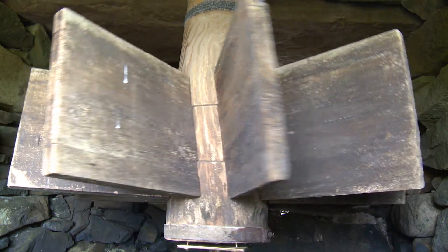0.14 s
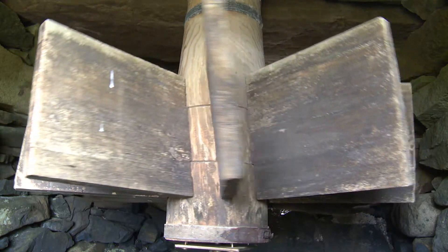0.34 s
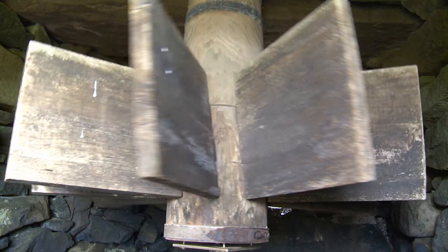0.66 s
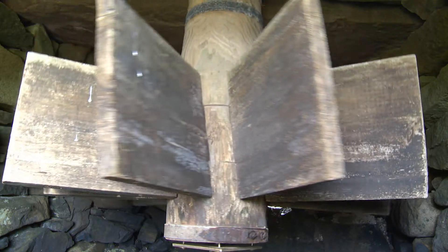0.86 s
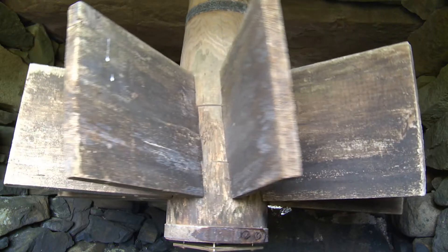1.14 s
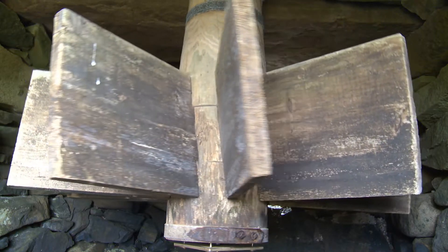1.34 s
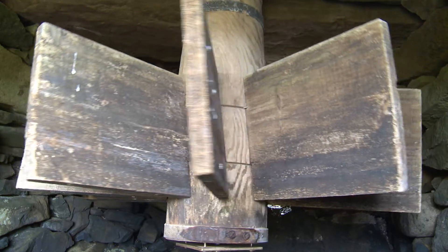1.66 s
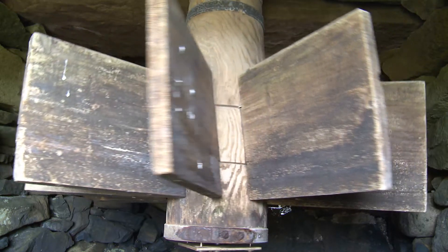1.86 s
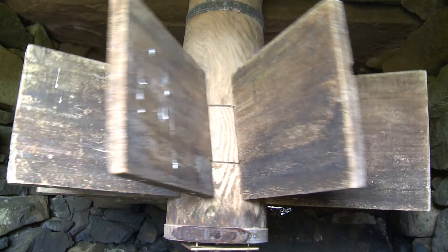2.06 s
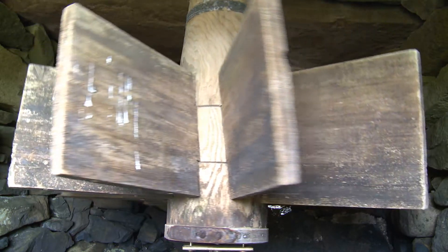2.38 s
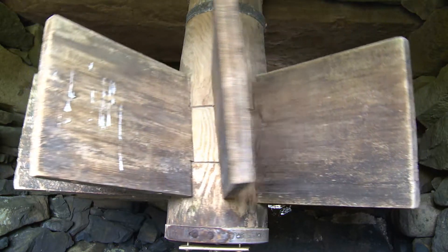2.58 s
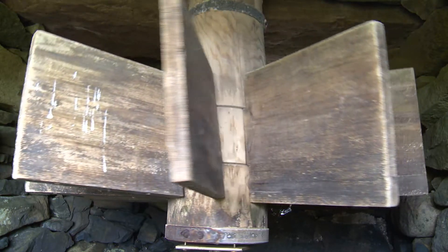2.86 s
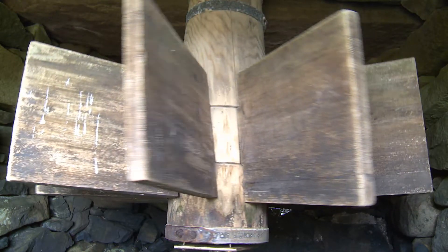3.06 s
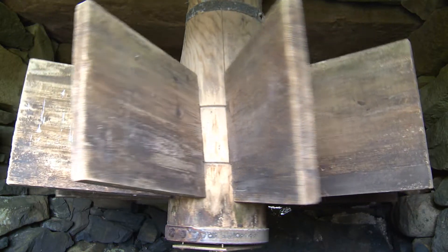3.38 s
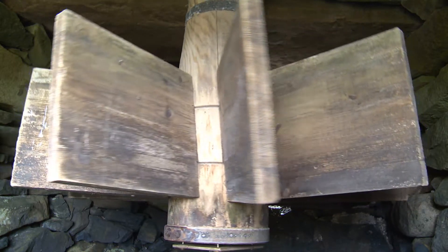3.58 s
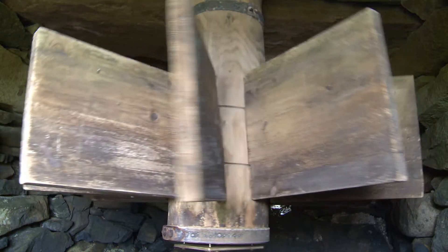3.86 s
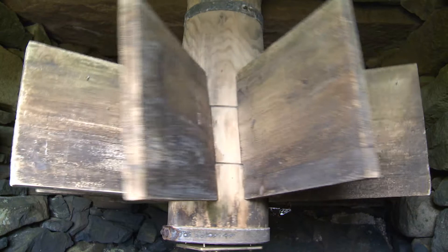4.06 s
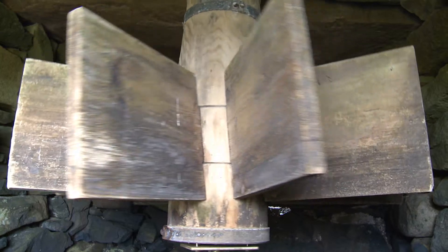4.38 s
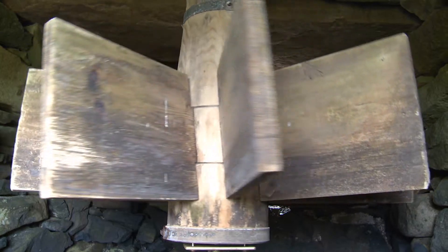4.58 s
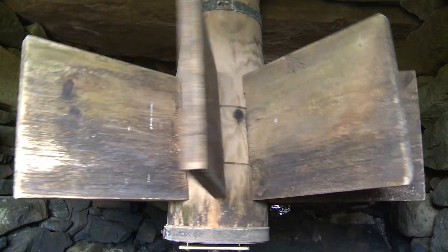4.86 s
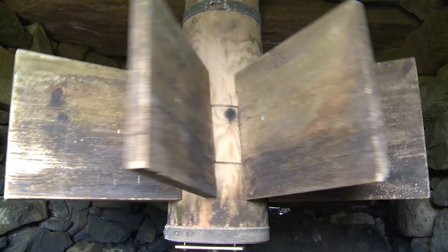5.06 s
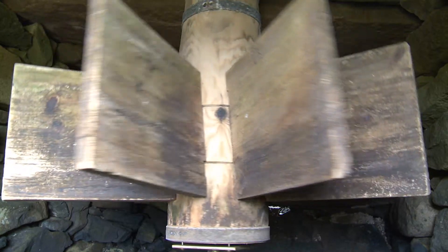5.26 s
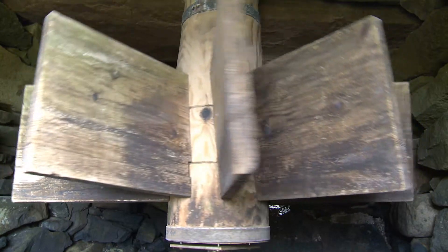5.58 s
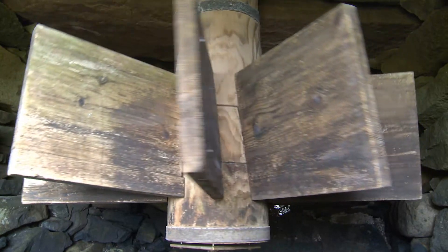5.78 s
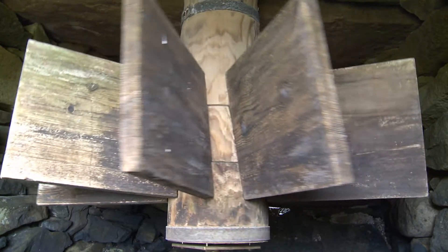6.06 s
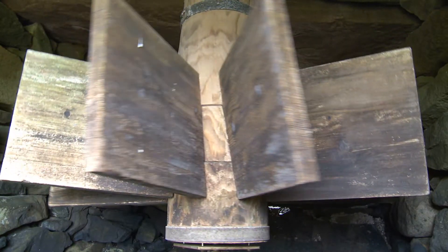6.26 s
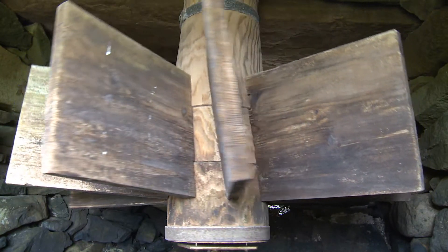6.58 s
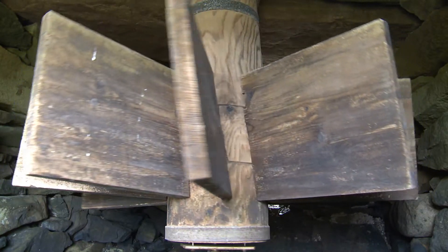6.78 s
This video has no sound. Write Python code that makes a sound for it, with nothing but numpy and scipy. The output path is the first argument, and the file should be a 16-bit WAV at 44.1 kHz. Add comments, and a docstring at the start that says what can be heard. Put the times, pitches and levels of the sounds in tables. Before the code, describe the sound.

Steady, dense gurgling water with only slight surges, heard close in a small stony hollow with a very short, dull echo. Single bubbles pop out at mid pitch, low gulps sound now and then, and faint droplets tick over soft spray. A broad low hum stays underneath. Deep wind thumps and flutter strike the microphone irregularly, heaviest in the middle and later part, easing at the end.

```python
"""In the stone pit under a mill, a stream rushes beside the wooden paddles of a wheel, itself not heard.
Bubbles of all sizes ring in the rush, as short-lived resonances struck at random over a noise blur;
fine spray and ticking droplets lie above it, and single bubbles stand out with a short stone echo.
The hollow under the stones hums as resonant noise and gulps in choked low notes.
Gusts of wind rumble on the microphone as three bands of low noise."""
import sys
import numpy as np
from scipy import signal
from scipy.io import wavfile
from scipy.ndimage import uniform_filter1d

SR = 44100
rng = np.random.default_rng(int(sys.argv[2]) if len(sys.argv) > 2 else 0)


def persist_wave(psi):
    """Save psi, clipped to +-1, as 16-bit WAV."""
    counts = np.round(np.clip(psi, -1, 1) * 32767).astype(np.int16)
    wavfile.write(sys.argv[1], SR, np.atleast_2d(counts).T)


def gain_from_db(level_db):
    """Convert decibel levels to linear amplitude factors (20 dB per decade)."""
    decades = np.asarray(level_db, float) / 20
    return 10 ** decades


N = 305524


def rms_one(x):
    """Scale to rms 1."""
    return x / np.sqrt(np.mean(x ** 2) + 1e-20)


def in_time(rows):
    """A two-column curve (time_s, value) at every sample."""
    return np.interp(np.arange(N) / SR, *np.transpose(rows))


def drift(rate_hz):
    """Slow random wander of spread 1: noise through a double one-pole low-pass."""
    step = 40   # samples between the slow values
    r = np.exp(-2 * np.pi * step * rate_hz / SR)
    noise = rng.standard_normal(N // step + 2002)
    slow = signal.lfilter([1], [1, -2 * r, r * r], noise)[2000:]   # past the filter's start
    return np.interp(np.arange(N) / step, np.arange(len(slow)), rms_one(slow - slow.mean()))


def resonate(x, hz, width_hz):
    """A two-pole resonance of gain 1 on top."""
    r = np.exp(-np.pi * width_hz / SR)
    poles = [1, -2 * r * np.cos(2 * np.pi * hz / SR), r * r]
    return signal.lfilter([(1 - r * r) / 2, 0, (r * r - 1) / 2], poles, x + 1e-18)


def even(x, span_s):
    """Divide out the slow level of a noise."""
    return x / np.sqrt(uniform_filter1d(x ** 2, int(span_s * SR)) + 1e-12)


def scatter(loudness, count):
    """Random rows (time_s, peak_db, pitch_hz), spread evenly over time and log pitch."""
    spread_db = 4   # either way
    hz_list, db_list = np.transpose(loudness)
    when, place, luck = rng.random((count, 3)).T
    hz = hz_list[0] * (hz_list[-1] / hz_list[0]) ** place
    peak_db = np.interp(np.log(hz), np.log(hz_list), db_list) + spread_db * (2 * luck - 1)
    return list(zip(when * (N - 1) / SR, peak_db, hz))


def add_plink(out, s, peak_db, hz, cycles, glide, swell_share):
    """A note swells and dies within a few cycles; glide bends its pitch, in % per cycle at first."""
    swell = swell_share * cycles   # cycles from onset to peak
    turns = np.arange(int(8 * swell / hz * SR)) * hz / SR
    bent = turns + glide / 100 * np.minimum(turns, 2 * cycles) * turns / 2
    wave = turns / swell * np.exp(1 - turns / swell) * np.sin(2 * np.pi * bent)
    at = max(round((s - 0.26 * swell / hz) * SR), 0)
    out[at:at + len(wave)] += gain_from_db(peak_db) * wave[:N - at]


def pit(x):
    """Eight feedback delays between the stone walls, duller on every round."""
    t60_s, stone_cut_hz = 0.16, 2200   # decay of the lowest pitches; low-pass on each round
    out, dull = np.zeros(N), np.exp(-2 * np.pi * stone_cut_hz / SR)
    for k, lag in enumerate((rng.uniform(0.006, 0.022, 8) * SR).astype(int)):
        loop, gain, state = x.copy(), gain_from_db(-60 * lag / SR / t60_s), [0.]
        for i in range(lag, N, lag):
            back, state = signal.lfilter([gain * (1 - dull)], [1, -dull], loop[i - lag:i], zi=state)
            loop[i:i + lag] += back[:N - i]
        out += (loop - x) * (-1) ** k   # echoes alone, in alternate polarity
    return out


def wind():
    """Eddies press on the diaphragm: big ones heave slowly, small ones flutter and buffet."""
    # heave, flutter and buffeting: low_hz, high_hz
    bands = [(5, 15.7), (18, 39.7), (45, 108)]
    # the same three bands: gain_db in wind
    band_gains = [0.4, 0.9, -3.5]
    # the same three bands: level_db of the steady low rumble that stays between gusts
    calm_levels = [-50, -59, -37.5]
    # breeze on the microphone, before the band gain: time_s, level_db
    breeze_curve = [(0.0, -33), (0.62, -47), (1.0, -33), (1.4, -42), (1.85, -26), (2.3, -38), (2.9, -32),
                    (3.9, -22.5), (4.2, -31.5), (5.4, -21), (6.3, -29), (6.55, -39), (6.93, -52)]
    # gusts, before the band gain: top_s, peak_db, half_length_s, eddy pitch in octaves above the heave
    gust_rows = [(0.0, -23, 0.05, 1.5), (0.12, -32, 0.08, 2.5), (0.813, -22, 0.034, 0.4),
                 (0.95, -26, 0.03, 1.4), (1.67, -12.5, 0.059, 0.4), (1.98, -18.5, 0.03, 3.5),
                 (2.027, -17.5, 0.054, 0), (2.57, -23, 0.07, 0.4), (2.707, -16, 0.04, 1.3),
                 (2.93, -24, 0.03, 2.5), (3.125, -8, 0.049, 0.3), (3.21, -12, 0.032, 1.4),
                 (3.296, -17, 0.02, 3.0), (3.384, -13, 0.04, 0), (3.58, -10.5, 0.04, 0.5),
                 (3.67, -6.5, 0.065, 0.7), (3.806, -14, 0.026, -2), (3.84, -8, 0.026, 1.1),
                 (4.034, -11.5, 0.053, 0.8), (4.125, -18, 0.033, 0.3), (4.306, -3, 0.026, 0.5),
                 (4.383, -12, 0.06, 0), (4.623, -16, 0.061, -0.5), (4.74, -7.5, 0.063, 0),
                 (4.84, -14, 0.028, 1.1), (4.893, -12, 0.04, 0.3), (4.996, -7.5, 0.035, 2.1),
                 (5.182, -7.5, 0.031, 0.5), (5.404, -17, 0.036, 2.4), (5.52, -9.5, 0.036, 1.4),
                 (5.66, -18, 0.036, 2.5), (5.74, -25, 0.04, 0.2), (6.1, -14, 0.058, 1.3),
                 (6.25, -17.5, 0.04, 0.1), (6.336, -15, 0.04, 1.2)]
    slope_db_per_octave = 7.5   # a gust weakens away from its eddy pitch
    t = np.arange(0, N, 64) / SR
    breeze_power = gain_from_db(2 * np.interp(t, *np.transpose(breeze_curve)))
    top_s, peak_db, half_s, pitch = np.transpose(gust_rows)
    swells = np.exp(-((t[:, None] - top_s) / half_s) ** 2)
    out, white = np.zeros(N), rng.standard_normal((3, N + SR))
    for k, (band_hz, noise, span_s) in enumerate(zip(bands, white, (0.16, 0.1, 0.08))):
        off_pitch = np.abs(pitch - 1.5 * k)   # bands lie about 1.5 octaves apart
        gust_power = swells @ gain_from_db(2 * (peak_db - slope_db_per_octave * off_pitch))
        wind_power = (gust_power + breeze_power) * gain_from_db(2 * band_gains[k])
        level = np.sqrt(wind_power + gain_from_db(2 * calm_levels[k]))
        band = signal.butter(2, band_hz, "band", fs=SR, output="sos")
        eddies = signal.sosfilt(band, noise)[SR:]   # past the filter's start
        out += np.interp(np.arange(N) / SR, t, level) * even(eddies, span_s)
    return out


def hollow():
    """The churning water keeps the air under the stones humming on one broad note."""
    # how hard the churn drives the hollow: time_s, hum level_db
    hum_curve = [(0.0, -21.5), (0.46, -24.5), (0.9, -23.5), (1.3, -27.5), (1.56, -24), (2.06, -22),
                 (2.3, -26), (2.85, -24), (3.0, -20.5), (3.5, -26), (3.71, -20), (4.67, -22.5), (4.94, -19),
                 (5.13, -24), (5.92, -22), (6.27, -23.5), (6.52, -27.5), (6.93, -24)]
    hz, width_hz = 196, 45.6
    hum = resonate(rng.standard_normal(N), hz, width_hz)
    hum = resonate(hum, hz, 1.48 * width_hz)
    return gain_from_db(in_time(hum_curve)) * rms_one(hum)


def gulps():
    """A pocket of air pulses at the pitch of the hollow: quick to start, choked after a few cycles."""
    # air trapped in the hollow: time_s (3 ms after the onset), level_db, pitch_hz
    gulp_rows = [(0.173, -7.5, 195), (1.368, -3, 188), (1.579, -4.5, 196), (3.507, -14, 203),
                 (3.869, -13, 219), (4.162, -12, 203), (4.365, -15, 220), (5.32, -14.5, 202),
                 (5.47, -10, 193), (5.965, -12.5, 196), (6.518, -9.5, 196)]
    choke_s = 0.031
    out, t = np.zeros(N), np.arange(int(3 * choke_s * SR)) / SR
    for s, level_db, hz in gulp_rows:
        wave = (1 - np.exp(-t / 0.0033)) * np.exp(-(t / choke_s) ** 3) * np.sin(2 * np.pi * hz * t)
        # the pocket's neck rings briefly above
        wave += 0.2 * np.exp(-t / 0.0094) * np.sin(2 * np.pi * 1.796 * hz * t)
        # the water around it is shoved aside
        wave -= 0.2 * np.exp(-t / 0.01) * np.sin(2 * np.pi * 0.54 * hz * t)
        at = round((s - 0.003) * SR)
        out[at:at + len(t)] += gain_from_db(level_db) * wave[:N - at]
    return out


def splashes(rows):
    """Each droplet also shatters: a short broad hiss around its pitch."""
    burst_db, die_s, octaves = -8.5, 0.0042, 0.27   # rms re the tick's peak; decay; reach either way
    out, t = np.zeros(N), np.arange(SR // 50) / SR
    for (s, peak_db, hz), noise in zip(rows, rng.standard_normal((len(rows), len(t)))):
        edges = np.clip([hz / 2 ** octaves, hz * 2 ** octaves], 100, 0.45 * SR)
        band = signal.butter(1, edges, "band", fs=SR, output="sos")
        hiss = rms_one(signal.sosfilt(band, noise))
        at = round(s * SR)
        out[at:at + len(t)] += (gain_from_db(peak_db + burst_db) * np.exp(-t / die_s) * hiss)[:N - at]
    return out


def droplets():
    """Droplets tick on a steady high pitch and shatter; lesser ones fall at random."""
    # the clearest spray ticks: time_s, peak_db, pitch_hz
    clear = [(0.0224, -26, 5570), (0.1613, -32, 8670), (0.181, -25.5, 4240), (0.2674, -28, 3640),
             (0.2893, -29, 4250), (0.4602, -30, 6950), (0.558, -32, 9460), (0.582, -35, 11290),
             (0.9255, -33, 14140), (1.2078, -29, 6530), (1.2887, -31, 7280), (1.4988, -28, 7650),
             (1.6673, -30, 5480), (2.0303, -25.5, 6040), (2.1219, -28.5, 4840), (2.3149, -35, 8460),
             (2.3753, -37, 13640), (2.3871, -30, 5570), (2.4111, -36, 14290), (2.4753, -29, 4950),
             (2.6489, -23.5, 4460), (2.7365, -30, 3760), (2.8114, -33, 4730), (3.2446, -30, 6620),
             (3.3457, -34, 10970), (3.6544, -29, 5770), (3.774, -34, 7070), (4.2066, -25, 3500),
             (4.8675, -34, 13050), (5.0574, -31, 13920), (5.149, -28.5, 5030), (5.6417, -30, 5300),
             (5.6893, -31, 11460), (5.8937, -31, 8200), (6.0272, -30, 8240), (6.3782, -32, 6730),
             (6.4083, -26, 4870), (6.738, -34, 8040), (6.7632, -35, 13640)]
    # loudness of the lesser ticks: pitch_hz, peak_db
    lesser = [(3300, -25), (5000, -32.5), (9000, -38.5), (14500, -36)]
    rows = clear + scatter(lesser, count=45)
    out = np.zeros(N)
    for s, peak_db, hz in rows:
        cycles = 3.1 + 0.3 * hz / 1000   # higher ticks ring for more cycles
        add_plink(out, s, peak_db, hz, cycles, glide=0, swell_share=0.5)
    return out + splashes(rows)


def bubbles():
    """Single bubbles ring out of the rush, their pitch gliding as they change shape."""
    # the clearest bubbles: time_s, peak_db, pitch_hz, length_cycles
    clear = [(0.0223, -26, 2520, 7), (0.0767, -19.5, 352, 4.9), (0.1402, -18.5, 407, 7.6),
             (0.183, -16, 2160, 3.5), (0.2834, -13, 1290, 5.9), (0.3278, -12, 1610, 3.8),
             (0.5939, -23, 2640, 5.4), (0.7358, -14.5, 440, 3.1), (0.812, -14.5, 383, 3.2),
             (0.9116, -13, 603, 2.9), (0.9471, -23, 2000, 10.5), (1.1639, -11, 1510, 2.7),
             (1.171, -17, 1750, 5.7), (1.2573, -17, 675, 2.9), (1.2981, -14.5, 1460, 5.6),
             (1.3858, -20, 337, 9.1), (1.4741, -16, 1740, 7.3), (1.5262, -13.5, 345, 9.6),
             (1.8645, -16, 397, 5.2), (1.8765, -17, 1210, 5.3), (2.0256, -17.5, 916, 5.2),
             (2.1072, -14, 1100, 5.8), (2.2503, -10.5, 660, 4.2), (2.3771, -23, 2740, 3.7),
             (2.3878, -19, 2350, 8.3), (2.3946, -11, 954, 8.9), (2.4245, -10, 1830, 3.9),
             (2.4989, -16, 1400, 7.2), (2.5386, -13, 827, 4), (2.5919, -16.5, 397, 3.1),
             (2.7086, -21.5, 2500, 7.9), (2.7612, -14, 1960, 6.9), (2.872, -12.5, 393, 4.8),
             (3.1287, -17, 743, 9.6), (3.2348, -18, 1750, 6.1), (3.2639, -15, 736, 3.8),
             (3.3312, -21, 2450, 5.7), (3.3555, -14.5, 904, 6.7), (3.575, -13, 594, 2.6),
             (3.7351, -15, 1540, 4.8), (3.7703, -14, 1890, 4.1), (3.7803, -15.5, 1650, 8.5),
             (4.02, -18, 994, 6.7), (4.0288, -15, 1770, 10.5), (4.0477, -16, 1950, 4.5),
             (4.0606, -15.5, 324, 4.9), (4.0715, -17, 1480, 7.3), (4.0989, -18, 1130, 6.8),
             (4.1469, -18, 2470, 7), (4.3559, -19.5, 2330, 9.1), (4.478, -15.5, 1580, 11.3),
             (4.4963, -16.5, 650, 4.9), (4.7318, -14.5, 587, 4.7), (4.8216, -12, 996, 4.1),
             (4.8493, -18, 2090, 5.1), (5.02, -16, 1030, 7), (5.1057, -12.5, 955, 3.9),
             (5.134, -12.5, 2100, 7.5), (5.2254, -16.5, 920, 3.5), (5.3014, -17, 1770, 7.5),
             (5.3803, -13, 1446, 6.9), (5.3925, -13, 1600, 2.6), (5.5577, -12, 1310, 4.6),
             (5.6122, -14, 373, 5.7), (5.6343, -16, 1310, 3.7), (5.7388, -16, 435, 2.9),
             (5.8823, -15, 495, 2.1), (6.0288, -9, 406, 3.7), (6.0693, -13.5, 795, 5.1),
             (6.0863, -12, 990, 4.5), (6.2908, -14, 865, 5.8), (6.5094, -10.5, 1460, 3.2),
             (6.7055, -15, 950, 4.9), (6.7066, -15, 1590, 6.5), (6.7312, -12.5, 1200, 7)]
    # loudness of the lesser bubbles, which come at random: pitch_hz, peak_db
    lesser = [(330, -21.5), (700, -19), (1600, -19.5), (2400, -24), (3200, -28)]
    rows = clear + [(*row, 4.8 * rng.uniform(0.75, 1.7)) for row in scatter(lesser, count=45)]
    out = np.zeros(N)
    for s, peak_db, hz, cycles in rows:
        glide = rng.normal(0.36, 1.0)   # % of pitch per cycle: they mostly rise a little
        add_plink(out, s, peak_db, hz, cycles, glide, swell_share=0.46)
    return out


def churn(spectrum, per_s, cycles, spread_db, smooth, clump_db, clump_hz, blur_follows, gurgle_db):
    """Countless bubbles dealt over log pitch, born in clumps, on the blur of those too far to tell apart."""
    hz_list, db_list = np.transpose(spectrum)
    low, high = hz_list[1], hz_list[-2]
    pitches = np.geomspace(low, high, int(9 * np.log2(high / low)))
    clumps = gain_from_db(clump_db * drift(clump_hz))
    sizes = gain_from_db(spread_db * np.minimum(rng.exponential(1, N), 4)) * rng.choice([-1, 1], N)
    born = rms_one(sizes * (rng.random(N) < per_s * clumps / SR))
    dealt = rng.integers(0, len(pitches), N)
    white = rng.standard_normal((2, N))
    blur_level = np.sqrt(smooth * clumps ** blur_follows)   # smooth: the blur's share of the power
    pockets = [drift(13.2) for _ in range(6)]   # bubbles of like size come in swarms
    out = np.zeros(N)
    for k, hz in enumerate(pitches):
        push = np.sqrt((1 - smooth) * len(pitches)) * born * (dealt == k) + blur_level * white[k % 2]
        width_hz = hz / (np.pi * cycles)
        ringing = resonate(push, hz, width_hz)
        ringing = resonate(ringing, hz, 3 * width_hz)   # softens the onset
        pocket, blend = divmod(4.99 * k / len(pitches), 1)
        pocket, turn = int(pocket), np.pi / 2 * blend
        swarm = np.cos(turn) * pockets[pocket] + np.sin(turn) * pockets[pocket + 1]
        level_db = np.interp(np.log(hz), np.log(hz_list), db_list)
        out += gain_from_db(level_db + gurgle_db * swarm) * ringing
    return rms_one(out)


def spray(flow_db):
    """Fine spray: many tiny high bubbles, swinging almost as far as the flow."""
    # relative density; the end rows lie outside the pitches used: pitch_hz, level_db per Hz
    spectrum = [(1470, -30), (2500, -10), (3740, -13), (4370, -7), (8140, -10.5), (9080, -14.5),
                (14700, -15.5), (16000, -29)]
    level_db = -47 + 0.92 * (flow_db - flow_db.mean())
    return gain_from_db(level_db) * churn(spectrum, per_s=2500, cycles=6.0, spread_db=4.0, smooth=0.65,
                                 clump_db=4.0, clump_hz=27, blur_follows=0.45, gurgle_db=0.5)


def rush(flow_db):
    """The body of the stream: bubbles of all sizes ringing together, as loud as the flow."""
    # relative density; the end rows lie outside the pitches used: pitch_hz, level_db per Hz
    spectrum = [(76, -42), (130, -15), (176, -15), (206, -6.5), (310, -10), (448, -6), (530, -12),
                (730, -8.5), (838, -12.5), (946, -10.5), (1190, -14.5), (1410, -12), (2290, -21.5),
                (3570, -36.5), (5000, -40.5), (6500, -64), (11000, -120)]
    return gain_from_db(flow_db) * churn(spectrum, per_s=1100, cycles=5.6, spread_db=2.0, smooth=0.47,
                                clump_db=2.5, clump_hz=12, blur_follows=0.49, gurgle_db=1.13)


def scene():
    """Wind at the microphone, the humming hollow, single water sounds with pit echo, spray and rush."""
    # the stream surges a little: time_s, flow as rush level_db
    flow_curve = [(0.0, -22.5), (0.46, -24), (0.9, -24), (1.25, -24), (1.79, -24), (2.06, -23.5),
                  (2.26, -24), (2.47, -22.5), (2.9, -24.5), (3.25, -23), (3.53, -25), (3.71, -21.5),
                  (3.9, -23), (4.67, -23), (4.9, -20.5), (5.2, -23), (5.46, -24), (5.92, -22.5),
                  (6.93, -23)]
    flow_db = in_time(flow_curve)
    single = gulps() + droplets() + bubbles()
    echo = gain_from_db(-16) * pit(single)
    return (wind() + hollow() + single + echo + spray(flow_db) + rush(flow_db))[None]


def low_pass(x):
    """Removes everything above the highest recorded frequency."""
    return signal.sosfilt(signal.butter(12, 16360, fs=SR, output="sos"), x)


def record(dry):
    """The microphone preamplifier rounds the big gusts, then full scale limits them."""
    rounded = 1.41 * np.tanh(dry / 1.417)
    finished = np.clip(rounded, -1, 1)
    return low_pass(finished)


dry = scene()
out = record(dry)
persist_wave(out)
```